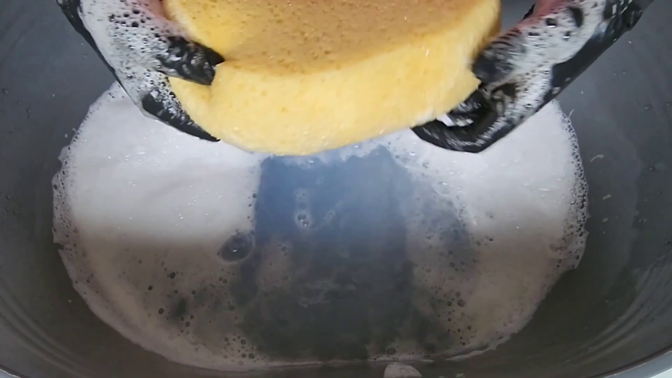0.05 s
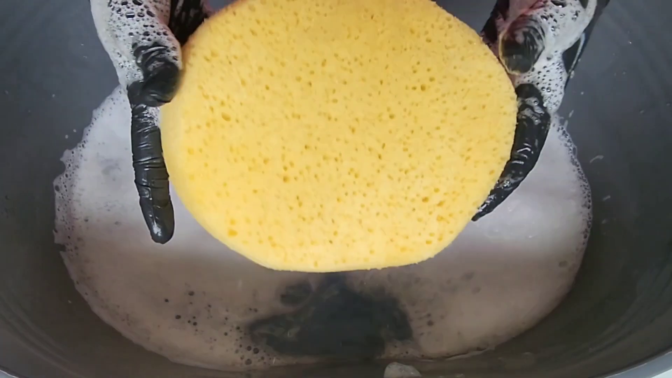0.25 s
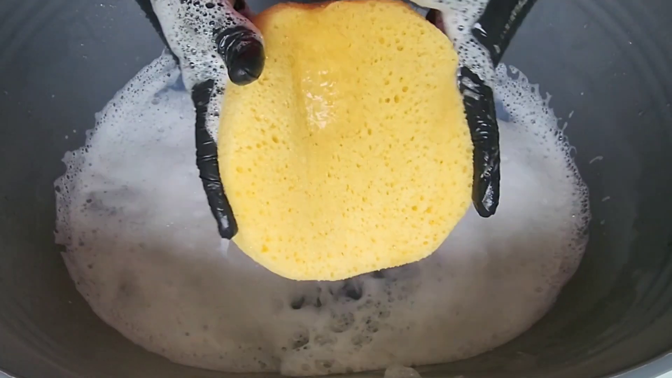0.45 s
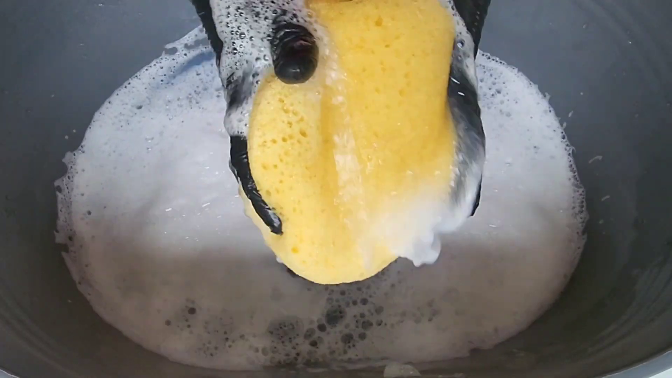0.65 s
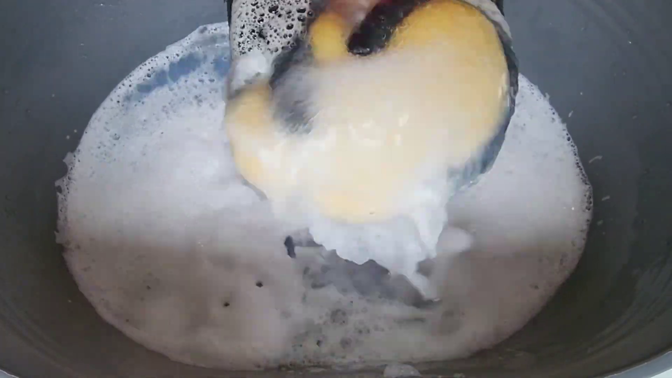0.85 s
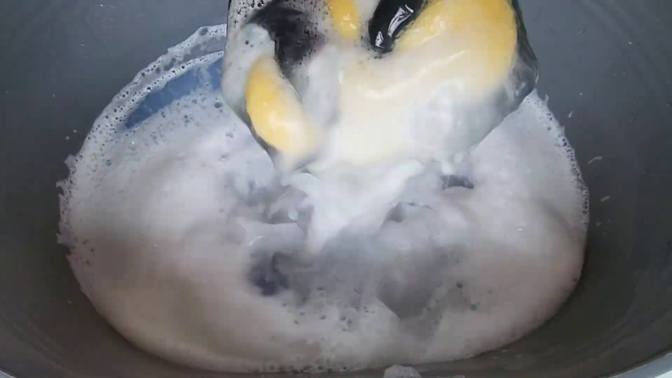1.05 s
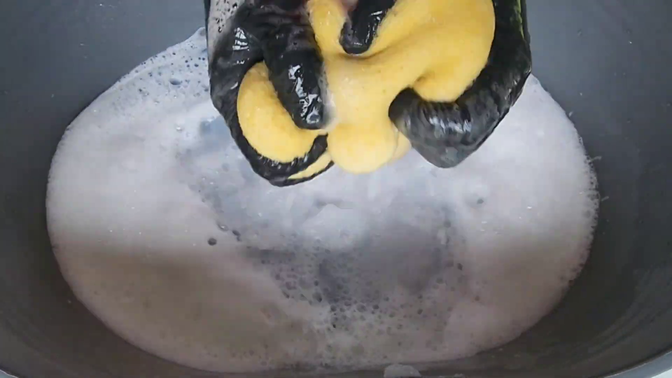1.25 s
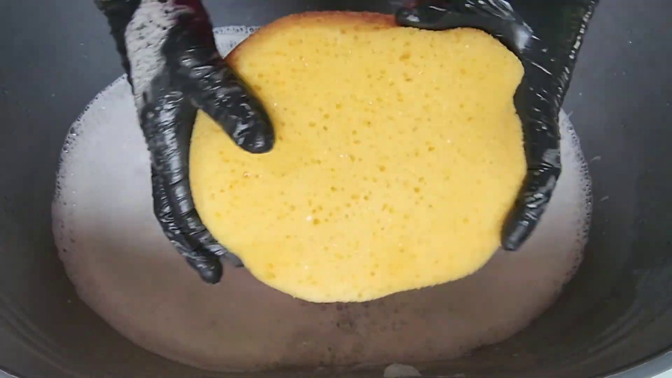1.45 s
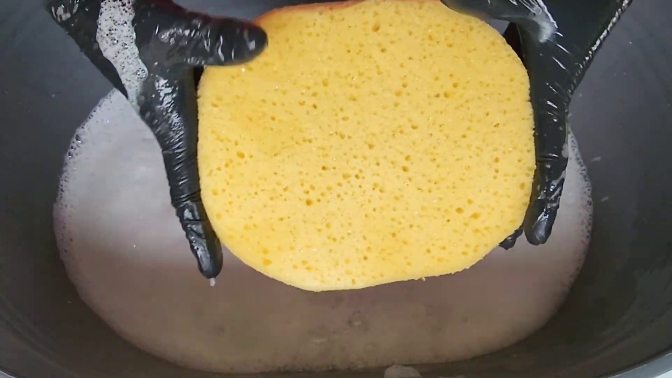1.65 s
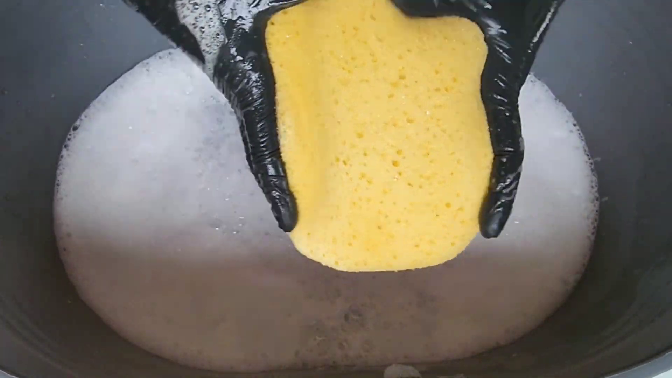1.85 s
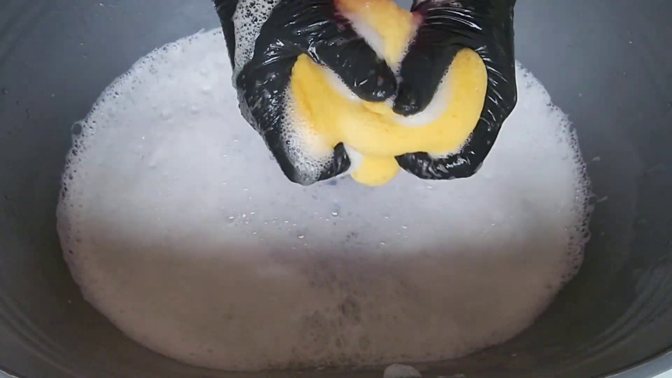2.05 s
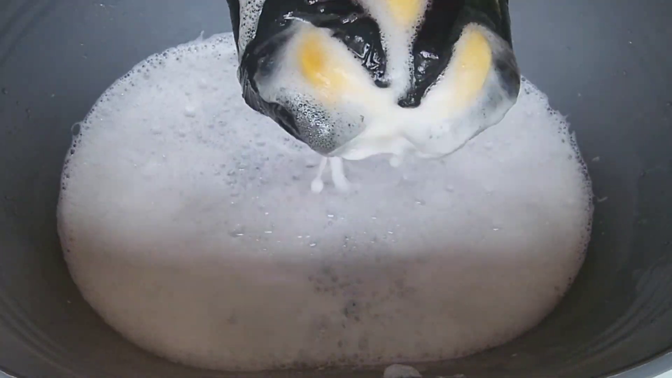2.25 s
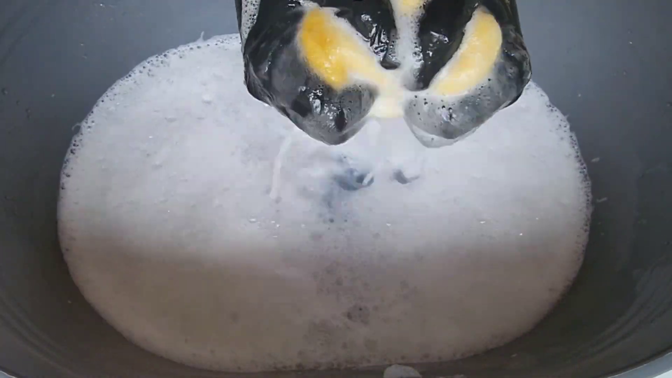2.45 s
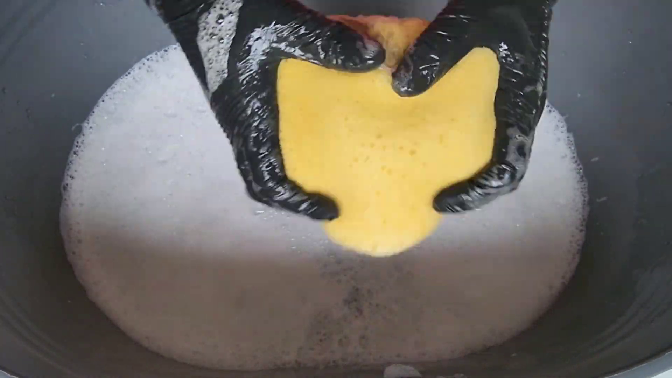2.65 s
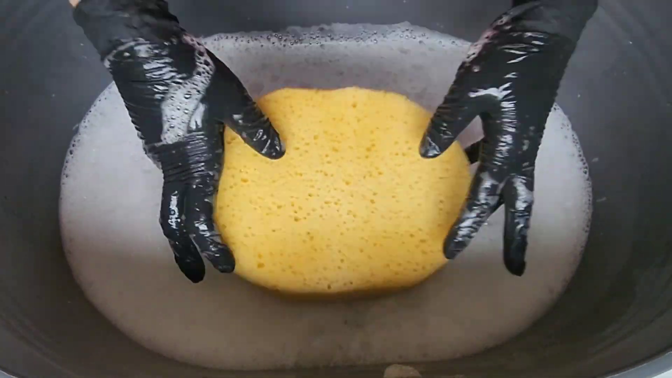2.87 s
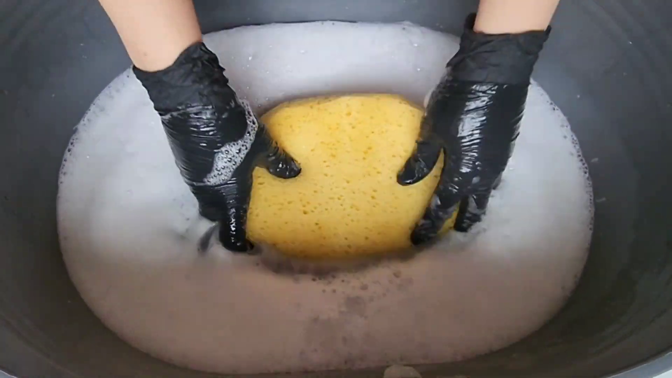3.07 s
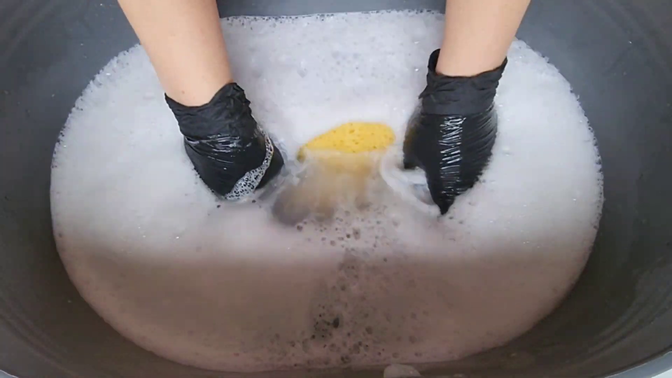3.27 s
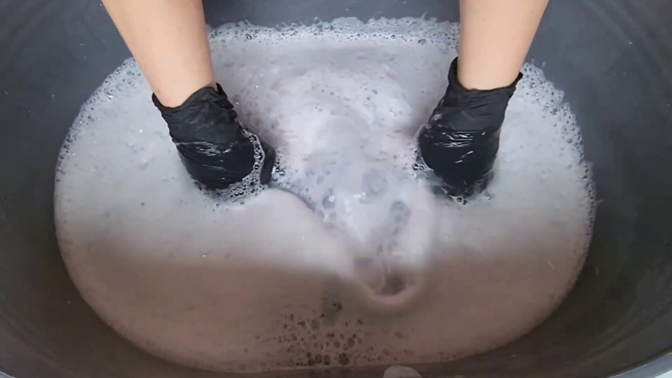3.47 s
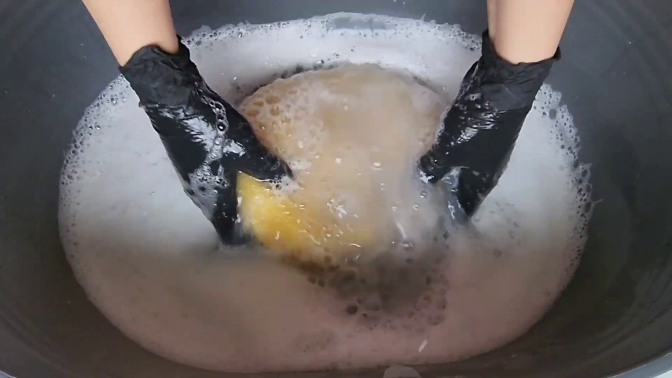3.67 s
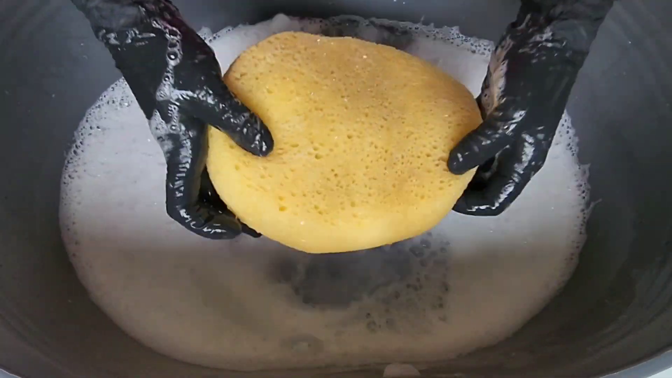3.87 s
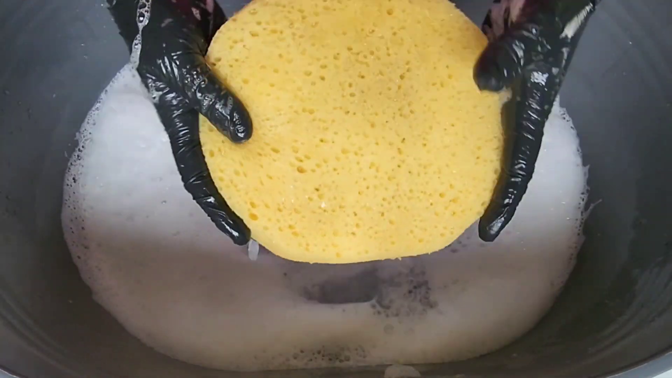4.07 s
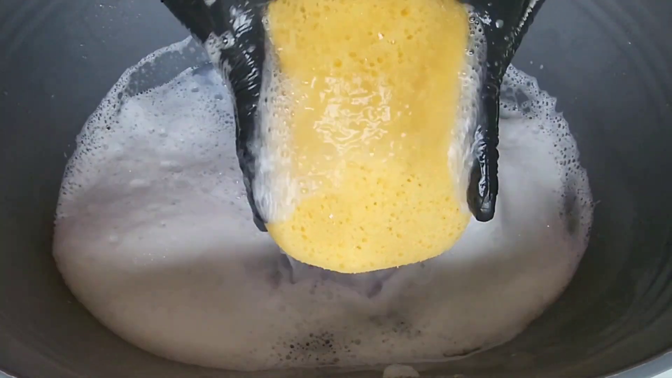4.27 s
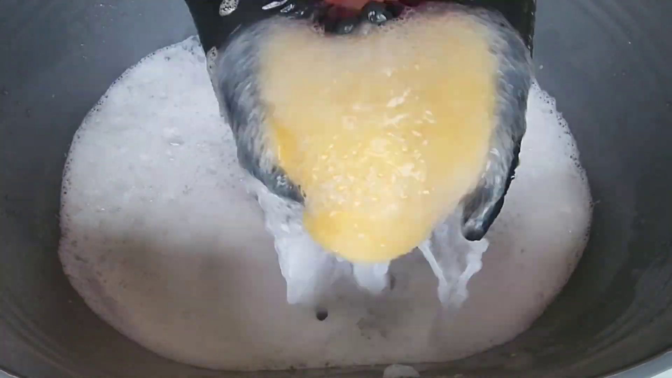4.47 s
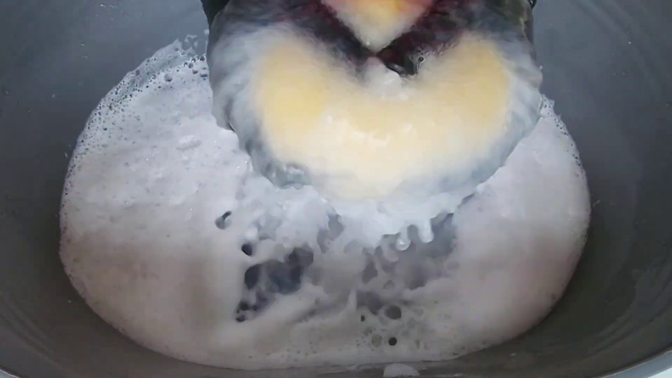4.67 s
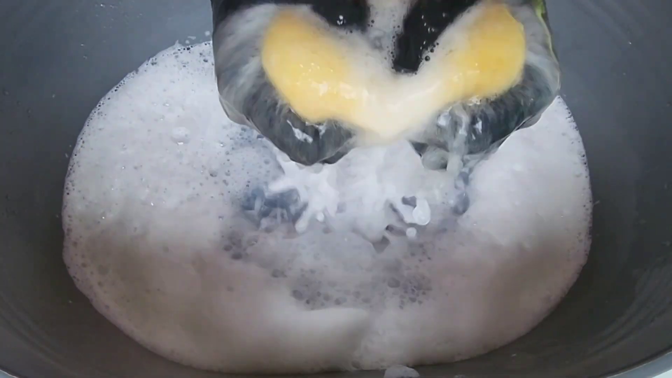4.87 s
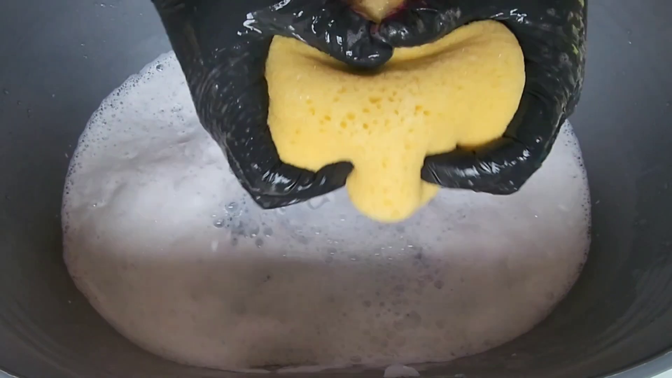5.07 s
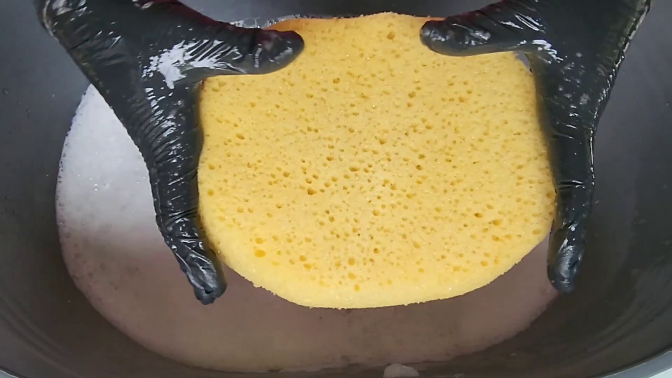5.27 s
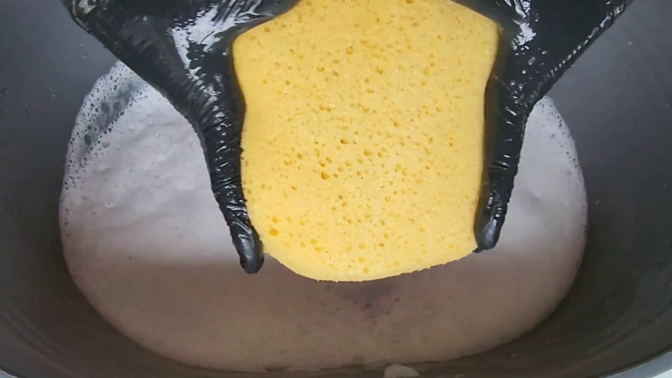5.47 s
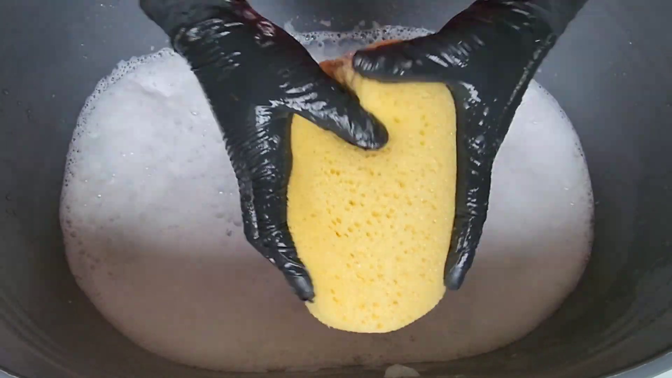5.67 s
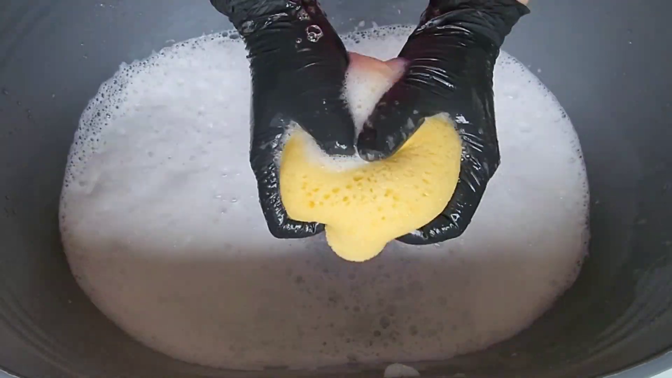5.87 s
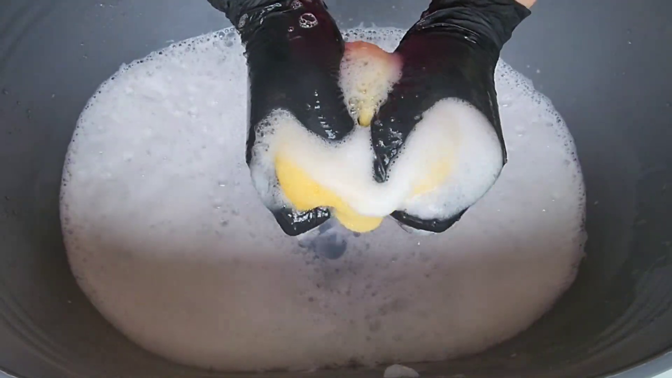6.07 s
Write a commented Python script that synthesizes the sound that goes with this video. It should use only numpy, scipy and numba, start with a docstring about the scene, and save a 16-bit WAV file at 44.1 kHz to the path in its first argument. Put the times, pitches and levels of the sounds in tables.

```python
"""Small room, basin of suds: gloved hands wring a big soapy sponge twice, dunk it, wring it twice more.
Each stroke swells and dies away. Water in the foam: short, damped sine bubbles, coloured or resonated.
Froth, lather and crushed foam: dense swarms of tiny bubbles. Air pockets and gulps: single longer rings.
The gloves tick in clusters of slips; one seal blubbers in puffs. Peak filters make the basin ring a little.
Random echoes make the room; shaped noise gives the faint hiss of the suds and a low rumble."""
import sys
import numpy as np
from scipy import signal
from scipy.fft import rfft, irfft
from scipy.io import wavfile
from scipy.ndimage import uniform_filter1d
from numba import njit

SR = 44100
rng = np.random.default_rng(int(sys.argv[2]) if len(sys.argv) > 2 else 0)


def int16_out(signal):
    """Quantize to a 16-bit WAV file."""
    q = np.round(np.clip(np.atleast_2d(signal).T, -1, 1) * 32767)
    wavfile.write(sys.argv[1], SR, q.astype(np.int16))


N = 269847
TIME = np.arange(N) / SR
STEPS = TIME[::64]   # coarse time grid of the strokes [s]

# Event and curve levels are relative: sources add trims, basin and room act later.
# Stroke rise and fall are the times for 20 dB; roundness 1 is pointed, 2 a bell.

# steady spectra of room rumble and foam hiss: (frequency [Hz], gain [dB])
RUMBLE_COLOUR = [(18, -13), (36, -10), (54, 4), (85, 0.5), (150, -16.5), (260, -15.5), (450, -21.5),
                 (900, -21), (2500, -53.5), (6000, -76.5)]
SUDS_COLOUR = [(600, -20), (2000, -1), (5000, -0.5), (8000, 2.5), (12000, -3), (15800, -1.5)]
RUMBLE_DB, SUDS_DB = -51.5, -55

# larger air pockets bursting:
# (time [s], ring level [dB], pitch [Hz], decay to -60 dB [cycles], snap level [dB])
POPS = [(0.02, -23.5, 739, 9.6, -36.5), (0.0202, -23, 1984, 14.1, -40.5),
        (0.0499, -19.5, 1410, 13.8, -26.5), (0.0665, -17.5, 454, 5.14, -37.5),
        (.1587, -27.5, 680, 4.5, -22), (0.1606, -22, 1130, 12.1, -30.5), (0.1902, -26, 686, 6.2, -25),
        (0.1928, -18.5, 2105, 13.4, -36), (.204, -32, 597, 13.3, -26), (.343, -29, 392.7, 9.5, -19.5),
        (.417, -32, 381.7, 12.5, -20), (.4718, -15, 618, 12.7, -19), (0.4818, -19.5, 579.5, 7.6, -20.5),
        (.629, -20, 599, 10.8, -29.5), (0.6562, -19.5, 516, 4.73, -10), (0.698, -19.5, 520, 6.6, -20),
        (.798, -23, 701, 7.06, -22), (.847, -26.5, 684, 8.5, -25), (0.873, -16, 1141, 8.5, -14),
        (1.008, -20.5, 689, 6.1, -19.5), (1.077, -20.5, 704, 6.9, -19), (1.322, -22.5, 1208, 9.46, -21),
        (1.605, -33.5, 390, 9.85, -34), (2.4, -34, 771, 10.3, -30), (2.564, -28, 429, 4, -32.5),
        (2.661, -32, 440.7, 4.87, -43), (3.264, -28, 675, 10, -27), (3.268, -22.5, 1301, 12, -36.5),
        (3.3164, -3.5, 250.7, 6.23, -36), (3.317, -20.5, 637, 6.26, -41.5), (3.329, -25, 61.7, 6.4, -47),
        (3.353, -15, 189.6, 8.3, -38.5), (3.583, -27, 1351, 11, -54.5), (3.726, -26, 689.9, 7.2, -21.5),
        (3.729, -27, 1129, 14.7, -40.5), (3.787, -25.5, 704, 9.7, -37), (3.824, -22.5, 596.4, 9.9, -18),
        (3.830, -21.5, 1492, 11.35, -23.5), (3.939, -24.5, 1437, 12.97, -33),
        (4.011, -32.5, 746.2, 8.02, -29), (4.061, -23, 3109, 19, -34.5), (4.107, -31, 792.1, 8.3, -24.5),
        (4.219, -20, 3446, 30.74, -36.5), (4.361, -20, 762.2, 10.56, -24.5), (4.4, -15, 1751, 14.22, -31.5),
        (4.416, -13.5, 2200, 19, -42.5), (4.469, -24.5, 680.7, 6.84, -29), (4.559, -16, 1892, 14.78, -30.5),
        (4.591, -12, 1197, 7.99, -14), (4.6706, -4.5, 1670, 12.62, -16), (4.683, -13, 2051, 19.8, -17),
        (4.7145, -19.5, 649.3, 5.14, -14.5), (4.782, -16, 1290, 7.4, -17.5), (4.908, -19, 1390, 16.2, -32),
        (4.935, -15, 1160, 16.28, -20), (4.994, -20, 1210, 13.4, -23.5), (5.052, -22, 1162, 22.6, -23),
        (5.066, -21, 1142, 15.63, -19), (5.203, -20, 221.4, 6.78, -14), (5.302, -32.5, 620.1, 8.77, -49),
        (5.386, -29, 729, 6.78, -53), (6.043, -30, 691.8, 5.94, -38)]

# jets of foam spitting from between the fingers: (time [s], level [dB], length [s])
SPITS = [(0.05, -34, 0.0029), (0.066, -32, 0.0082), (.203, -37, 0.0119), (.415, -31, 0.0039),
         (0.474, -37.5, 0.00524), (0.964, -30, 0.0151), (1.073, -30.5, 0.01193), (1.197, -31, 0.00912),
         (1.606, -33.5, 0.00169), (3.822, -37, 0.0147), (4.112, -34, 0.0211), (4.281, -32, 0.00568),
         (4.358, -30.5, 0.00671), (4.714, -22.5, 0.00447), (4.73, -25.5, 0.0057), (4.936, -28.5, 0.0077)]

# water set moving by each stroke: (peak time [s], rise [s], fall [s], roundness [1],
# splash level [dB], churn level [dB], cloud pitch at peak [Hz], bubble rate at peak [1/s])
GUSHES = [(0.065, 0.1505, 0.099, 1.804, -41, -42, 442, 502),
          (0.21, 0.0898, 0.29, 1.117, -39, -67.5, 440, 719.5),
          (0.66, 0.0858, 0.2006, 1.235, -35, -36, 335.6, 859),
          (0.93, 0.8324, 0.653, 1.877, -33.5, -34.5, 264.7, 1000),
          (1.33, 0.0984, 0.282, 1.46, -46, -44, 213, 1678),
          (2.18, 0.3365, 0.226, 0.948, -44, -51.5, 281.7, 5270),
          (2.45, 0.0631, 0.104, 1.582, -58, -49, 519.2, 1532),
          (2.57, 0.1608, 0.3255, 1.306, -47, -46.5, 410.1, 2780),
          (3.345, 0.07, 0.26, 0.86, -39, -32.5, 180.5, 894),
          (3.54, 0.16, 0.15, 1.3, -45.5, -42, 219.8, 522),
          (3.79, .17, 0.2795, 1.105, -37.5, -43.5, 590, 1940),
          (3.82, 0.3814, .28, 1.612, -55, -47, 279.7, 830),
          (4.117, 0.031, 0.07056, 1.103, -32.5, -45, 420.4, 809),
          (4.32, 0.1998, .2, 1.65, -45, -37.5, 329.8, 509),
          (4.48, 0.048, 0.0716, 0.997, -44.5, -35.5, 308, 964),
          (4.73, 0.74, 0.5555, 1.8, -30, -34, 280, 1250),
          (4.94, 0.03637, 0.3074, 0.989, -35.5, -37, 255, 1622),
          (5.87, 0.0731, 0.206, 0.902, -36.5, -37.5, 285.6, 3545)]
# churn and splash filters: (frequency [Hz], gain [dB])
THUD_COLOUR = [(35, -10), (54, 1), (80, -5), (112, 2), (158, -4), (255, 1), (380, -2), (480, 0.5),
               (700, -6), (1500, -21.5)]
POUR_COLOUR = [(200, -16), (400, -8.5), (600, -4), (900, -5.5), (1300, -1), (2100, 1), (2900, -9),
               (5000, -9.5), (12000, -48)]
CLOUD_SINK_OCTAVES_PER_S = 0.994   # the cloud under the stream sinks in pitch as it takes in air
THUD_DB_PER_OCTAVE, THUD_REFERENCE_HZ = 11.5, 257.7   # thuds gain weight as the cloud sinks
BREAKUP_FOLLOWS = 0.7   # share of the flow's dB swing that the bubble rate follows
POUR_SURGE_DB, POUR_SURGE_HZ = 1.8549, 32   # uneven surges: spread, bandwidth
DROPS_PER_S, DROPS_DB = 70, -8.5   # single drops breaking away; level against the splash
DUNK_FROM_S, DUNK_TO_S, DUNK_RAMP_S, DUNK_MUFFLE_DB = 3.35, 3.72, 0.0521, 8   # sponge under water
SWIRL_START_HZ, SWIRL_RISE_OCTAVES_PER_S = 254.75, 4.7   # filling sponge: smaller, higher bubbles

# pushes that press froth through the pores: (peak time [s], rise [s], fall [s], roundness [1],
# level [dB], top-band gain [dB], bubble rate [1/s])
PUSHES = [(0.075, 0.1222, 0.1012, 1.032, -43, 3, 7590), (0.22, 0.0979, 0.329, 1.003, -38.5, -6, 8230),
          (1.06, 1.19, 0.447, 1.238, -35.5, -0.5, 15270), (1.3, 0.161, 0.264, 1.031, -36, -2.5, 16140),
          (2.15, 0.345, 0.253, 0.684, -35.5, -0.5, 49500), (2.55, 0.0514, 0.1606, 1.1, -38, 2.5, 27100),
          (2.73, 0.076, 0.1468, 1.115, -46.5, 3, 20800), (2.885, 0.0252, 0.457, 0.816, -48.5, -7.5, 17000),
          (3.31, 0.211, 0.316, 1.041, -50.5, -1.5, 8750), (3.83, 0.2015, 0.261, .7, -41, -1.5, 11000),
          (4.15, 0.501, 0.2003, 0.896, -43.5, -0.5, 10130), (4.38, .04, 0.21, 1, -40.5, 5.5, 10200),
          (4.73, 0.05776, 0.0694, 1.138, -31, -5, 20840), (4.76, 0.814, 0.565, 1.867, -34.5, 0.5, 16100),
          (4.96, 0.0638, 0.0957, 1.2, -37.5, -3, 14480), (5.22, 0.2034, 0.1117, 1.84, -46, -2.5, 14060),
          (5.99, 0.417, 0.222, 1.136, -41, -0.5, 28300)]
# froth filter: (frequency [Hz], gain [dB])
FROTH_COLOUR = [(400, -35), (1000, 10), (2500, 3.5), (4000, 4.5), (5500, 1), (7500, 1), (9500, -5),
                (12000, -5), (15800, -6.5)]
FINER_DB_PER_S = 3   # froth gets finer, its top band brighter, through a push

# lumps of water slapping onto the suds: (time [s], level [dB], length [s])
SLAPS = [(.16, -35, 0.0049), (.211, -40, 0.006), (.232, -36, 0.005), (.511, -34, 0.0086),
         (.588, -38.5, 0.00562), (.871, -30, 0.0069), (.981, -31.5, 0.00493), (1.008, -29.5, 0.00504),
         (1.076, -31.5, 0.0077), (1.108, -34.5, 0.0036), (1.272, -32.5, 0.00422), (1.354, -35.5, 0.0043),
         (3.313, -33, 0.0086), (3.344, -39.5, 0.0164), (3.726, -37.5, 0.00852), (3.824, -32.5, 0.014),
         (4.011, -37, 0.00703), (4.107, -32, 0.00406), (4.136, -28.5, 0.00572), (4.274, -32, 0.00947),
         (4.361, -34, 0.00607), (4.591, -28, 0.004996), (4.713, -31.5, 0.005845), (4.741, -28.5, 0.00485),
         (4.908, -30, 0.0085), (4.966, -30.5, 0.00696)]

# deep bubbles pulled under by the stream or let go by the sunken sponge:
# (peak time [s], level [dB], pitch [Hz])
GULPS = [(.567, -28.5, 567), (.591, -26.5, 331), (.632, -21.5, 319.8), (.679, -23.5, 308.3),
         (0.771, -29, 274.7), (.8, -28.5, 289), (.858, -23.5, 366), (1.013, -30, 273.6),
         (1.079, -25.5, 276.6), (1.16, -26, 244.5), (1.204, -26, 289), (1.44, -24.5, 224.8),
         (3.348, -19, 324), (3.364, -18, 327.5), (3.491, -30.5, 399.8), (3.523, -35, 475.7),
         (3.543, -34, 562.8), (3.565, -32, 676.8), (3.754, -29, 575.7), (3.885, -33, 570),
         (4.209, -24.5, 405.8), (4.362, -28.5, 329.8), (4.475, -22, 310.5), (4.491, -18, 328.6),
         (4.601, -23, 292), (4.633, -23.5, 308.7), (4.674, -23.5, 294), (4.764, -24, 313.8),
         (4.805, -22.5, 265), (4.864, -21.5, 265.2), (4.941, -24.5, 300.2), (5.061, -23, 258)]

# wet rubber ticking as the gloves shift grip: (time [s], level [dB], pitch [Hz])
TICKS = [(1.6061, -21.5, 2360), (1.6338, -30, 1594), (2.329, -40, 1600), (2.3996, -28.5, 1899),
         (2.457, -31.5, 2610), (2.489, -21.5, 3520), (2.506, -31, 1500), (2.521, -32, 1900),
         (3.216, -32.5, 2004)]

# thick lather squelching in a nearly dry sponge, wrung or springing back:
# (peak time [s], rise [s], fall [s], roundness [1], level [dB])
LATHER = [(2.2, 0.077, 0.0937, 2.595, -35.5), (2.73, 0.0704, 0.084, 1.297, -48.5),
          (5.99, 0.148, 0.188, 2.53, -40)]
# lather filter: (frequency [Hz], gain [dB])
LATHER_COLOUR = [(500, -27), (1000, -4), (2200, -2.5), (4400, 3), (6500, -0.5), (8500, -3.5),
                 (15000, -40.5)]

# sponge landing on the suds and crushing its way down: (time [s], level [dB])
CRUSH = [(2.855, -79), (2.868, -49.5), (2.888, -37.5), (2.915, -45), (2.94, -46), (3.02, -51),
         (3.055, -56.5), (3.13, -55), (3.27, -56.5), (3.33, -77.5)]
# crush filter: (frequency [Hz], gain [dB])
CRUSH_COLOUR = [(150, -10), (330, -2), (560, -0.5), (900, -5.5), (1400, -1.5), (2100, -1), (3500, -14.5),
                (8000, -33)]

# air blubbering out between glove and sponge in the last wring: (time [s], level [dB])
BLUBBER = [(5.822, -70), (5.831, -41), (5.87, -35), (5.91, -36), (5.97, -38), (6.0, -38.5), (6.025, -49),
           (6.12, -54)]
# blubber filter: (frequency [Hz], gain [dB])
BLUBBER_COLOUR = [(70, -20.5), (160, -3.5), (260, 3), (390, -1.5), (470, -12.5), (680, -10), (950, -16),
                  (1200, -24.5), (1600, -13.5), (4000, -22)]

# resonances of the basin: (frequency [Hz], width [Hz], boost [dB])
BASIN = [(255.54, 90.2, 4.0), (387.8, 44, 4), (558.9, 78.2, 5.5), (709.2, 102.8, 6), (1176.5, 258, 3),
         (1811, 95, -1.5)]
# stereo width: (frequency [Hz], side gain [dB])
WIDTH = [(60, -14), (220, -13.5), (500, -1.5), (1200, 1), (2700, 0), (4500, 0), (6300, 1), (7800, -8.5),
         (15000, -7)]
ROOM_T60_S, CUTOFF_HZ = 0.415, 15750


def from_db(db):
    """Decibels to gain."""
    return 10 ** (np.asarray(db) / 20)


def rms_one(x):
    """Scale to unit power."""
    return x / np.sqrt(np.mean(x ** 2) + 1e-20)


def in_time(rows):
    """Each column of a curve, sample by sample."""
    s, *values = np.transpose(rows)
    return [np.interp(TIME, s, value) for value in values]


def columns(rows):
    """Columns of an event table, one event to a line."""
    return np.transpose(rows)[:, :, None]


def stroke_db(s, rise_s, fall_s, roundness):
    """Level of each stroke below its peak, on STEPS."""
    away = np.maximum((s - STEPS) / rise_s, (STEPS - s) / fall_s)
    return -np.minimum(20 * away ** roundness, 120)


def overlap(levels_db, *traits):
    """Strokes add in power, which also weights their traits: level [dB], then traits, per sample."""
    power = from_db(levels_db) ** 2
    total = power.sum(axis=0)
    curves = [10 * np.log10(total)]
    curves += [(power * trait).sum(axis=0) / total for trait in traits]
    return [np.interp(TIME, STEPS, curve) for curve in curves]


def bursts(rows):
    """Gain of brief showers, each peaking at half its length and dying quickly."""
    gain = np.zeros(N)
    for s, level_db, length_s in rows:
        age = TIME[:SR // 8] / length_s
        start = int(s * SR)
        gain[start:start + len(age)] += from_db(level_db) * 2 * age * np.exp(1 - 2 * age)
    return gain


def drift(rate_hz):
    """Random wander below rate_hz, spread 1, drawn at 1/40 of the sample rate."""
    lowpass_sos = signal.butter(2, rate_hz * 40, fs=SR, output="sos")
    slow = signal.sosfilt(lowpass_sos, rng.standard_normal(N // 40 + 500))[400:]
    return np.interp(np.arange(N) / 40, np.arange(len(slow)), rms_one(slow))


def lowpass(x, hz, order=2):
    """Butterworth low-pass."""
    return signal.sosfilt(signal.butter(order, min(hz, SR / 2 - 1), fs=SR, output="sos"), x)


def coloured(x, spectrum, size=4096):
    """Causal (minimum-phase) filter through the points of a spectrum."""
    hz, db = np.transpose(spectrum)
    grid_hz = np.maximum(np.fft.rfftfreq(size, 1 / SR), 1)
    cepstrum = irfft(np.log(from_db(np.interp(np.log(grid_hz), np.log(hz), db))))
    # fold onto positive time
    cepstrum[1:size // 2] *= 2
    cepstrum[size // 2 + 1:] = 0
    impulse = irfft(np.exp(rfft(cepstrum)))
    return signal.oaconvolve(x, impulse[None], axes=1)[:, :N]


@njit
def resonate(x, hz, q):
    """State-variable band-pass with moving centre; gain 1 on top."""
    out, low, band = np.zeros(N), 0.0, 0.0
    for i in range(N):
        step = 2 * np.sin(np.pi * hz[i] / SR)
        low += step * band
        band += step * (x[i] - low - band / q)
        out[i] = band / q
    return out


@njit
def rings(start, height, hz, cycles, rise, swell):
    """Sines building up over swell cycles, decaying at 60 dB per cycles, pitch rising by the share rise."""
    out = np.zeros(N)
    for k in range(len(start)):
        life_s = cycles[k] / hz[k]
        strength, loss = height[k], 0.001 ** (1 / (life_s * SR))
        first = max(int(start[k] * SR) + 1, 0)
        last = min(int((start[k] + .8 * life_s) * SR), N)
        for i in range(first, last):
            turns = hz[k] * (i / SR - start[k])
            phase = 2 * np.pi * turns * (1 + rise * turns / cycles[k] / 2)
            out[i] += strength * min(turns / swell, 1.0) * np.sin(phase)
            strength *= loss
    return out


def bubbles(start, height, hz, cycles, rise, swell=0.072, spread_s=.00008, pan_db=3.5):
    """Each bubble has its own place: its own lag and balance between left and right."""
    lag, pan = rng.standard_normal((len(start), 2)).T
    sides = []
    for side in (1, -1):
        arrival_s = start + side * lag * spread_s / 2
        side_height = height * from_db(side * pan * pan_db / 2)
        sides.append(rings(arrival_s, side_height, hz, cycles, rise, swell))
    return np.array(sides)


def swarm(per_s, low_hz, high_hz, cycles, size_db, rise):
    """Random bubbles of even mean power: the fewer they are, the larger each one."""
    per_s = per_s * np.ones(N)
    at = np.flatnonzero(rng.random(N) < per_s / SR)
    pitch, size, damping, sign = rng.random((len(at), 4)).T
    hz = low_hz * (high_hz / low_hz) ** np.sqrt(pitch)   # small bubbles outnumber large ones
    size_gain = from_db(size_db * np.minimum(-np.log(1 - size), 3))
    height = size_gain * np.sqrt(hz / per_s[at])
    return bubbles(at / SR, height * np.sign(sign - .5), hz, cycles * (.5 + damping), rise)


def rumble():
    """Steady low background of the room: shaped noise, partly shared by both sides."""
    noise = rng.standard_normal(N) + 2.0 * rng.standard_normal((2, N))
    return from_db(RUMBLE_DB) * rms_one(coloured(noise, RUMBLE_COLOUR, size=16384))


def suds():
    """The blanket of foam in the basin never stops its faint, even hiss: shaped noise."""
    noise = rng.standard_normal(N) + 2.0 * rng.standard_normal((2, N))
    return from_db(SUDS_DB) * rms_one(coloured(noise, SUDS_COLOUR))


def pops(snap_hz=2300, snap_cycles=2.25, scatter_s=.002, droplet_db=-5, count=6):
    """A film snaps, the air pocket behind it swells and rings, droplets of the film patter after."""
    s, ring_db, hz, cycles, snap_db = np.transpose(POPS)
    each = np.ones(len(s))
    cavity = bubbles(s, from_db(ring_db + 1.0), hz, cycles,
                     rise=0.0123, swell=0.751, spread_s=.00004, pan_db=3.0)
    snap = bubbles(s, -from_db(snap_db + 4.5), snap_hz * each, snap_cycles * each,
                   rise=0.077, spread_s=.00005)
    late, pitch, size = rng.random((len(s) * count, 3)).T
    height = np.repeat(from_db(snap_db + droplet_db), count) * (2 * size - 1)
    start = np.repeat(s, count) - scatter_s * np.log(1 - late)
    droplets = bubbles(start, height, 1100 * 5.5 ** pitch, 6 + 8 * pitch, rise=0.098)
    return cavity + snap + droplets


def spits():
    """Each jet is a brief shower of tiny bubbles."""
    shower = swarm(per_s=9000, low_hz=1600, high_hz=17500, cycles=14, size_db=1.5, rise=.05)
    return bursts(SPITS) * rms_one(shower)


def churn(cloud_q=2.38, cloud_db=7, wander=0.1194, deep_hz=420):
    """Lumps of water thud into the basin; others set the restless cloud of bubbles booming."""
    s, rise_s, fall_s, roundness, _, churn_db, peak_hz, _ = columns(GUSHES)
    sinking_hz = peak_hz * 2 ** (-CLOUD_SINK_OCTAVES_PER_S * np.clip(STEPS - s, -1, 1))
    level_db, cloud_hz = overlap(churn_db + stroke_db(s, rise_s, fall_s, roundness), sinking_hz)
    thuds, lumps = [
        coloured(swarm(per_s=560, low_hz=35.14, high_hz=697, cycles=4.8, size_db=2.0, rise=0.072),
                 THUD_COLOUR)
        for _ in range(2)]
    weight = from_db(-THUD_DB_PER_OCTAVE * np.log2(cloud_hz / THUD_REFERENCE_HZ))
    cloud_hz = cloud_hz * np.exp(wander * drift(rate_hz=29.1))
    boom = np.array([resonate(resonate(side, cloud_hz, cloud_q), cloud_hz, cloud_q) for side in lumps])
    mix = weight * lowpass(thuds, deep_hz) + from_db(cloud_db) * boom
    return from_db(level_db - 2.5) * rms_one(mix)


def drops(smack_hz=2600, smack_cycles=3.8, ring_db=-6, ring_hz=1150, ring_cycles=11,
          delay_s=0.001999, size_db=8):
    """A drop smacks the surface; a moment later the bubble it traps rings and rises."""
    s = np.flatnonzero(rng.random(N) < DROPS_PER_S / SR) / SR
    size, smack, pitch, late = rng.uniform(-1.01, 1, (4, len(s)))
    height, each = from_db(size_db * size / 2), np.ones(len(s))
    impact = bubbles(s, height, smack_hz * 2 ** smack, smack_cycles * each, rise=.1, spread_s=.00005)
    trapped = bubbles(s + delay_s * (1 + late), height * from_db(ring_db),
                      ring_hz * 2 ** pitch, ring_cycles * each, rise=0.244)
    return rms_one(impact + trapped)


def swirl(q=0.97):
    """Under water the bubbles merge into a dull swirl through a rising band-pass."""
    merged = swarm(per_s=420, low_hz=121.3, high_hz=1518.7, cycles=12.3, size_db=2.0, rise=0.364)
    merged = lowpass(merged, hz=824)
    under_s = np.clip(TIME, DUNK_FROM_S, DUNK_TO_S) - DUNK_FROM_S
    centre_hz = SWIRL_START_HZ * 2 ** (SWIRL_RISE_OCTAVES_PER_S * under_s)
    return rms_one(np.array([resonate(side, centre_hz, q) for side in merged]))


def pour(plop_db=-12):
    """Falling water traps bubbles that foam damps in a few cycles; the dunk fades them into the swirl."""
    s, rise_s, fall_s, roundness, splash_db, _, _, peak_per_s = columns(GUSHES)
    flow_db = stroke_db(s, rise_s, fall_s, roundness)
    rate_per_s = peak_per_s * from_db(BREAKUP_FOLLOWS * np.maximum(flow_db, -15))
    level_db, per_s = overlap(splash_db + flow_db, rate_per_s)
    splash = swarm(per_s, low_hz=387.6, high_hz=4368, cycles=9.65, size_db=2.0, rise=0.287)
    splash = rms_one(coloured(splash, POUR_COLOUR))
    # a few bubbles reach open water and ring longer
    plops = swarm(per_s=130, low_hz=523.6, high_hz=2982, cycles=33.5, size_db=1.5, rise=0.483)
    splash = splash + from_db(plop_db) * rms_one(plops) + from_db(DROPS_DB) * drops()
    splash = rms_one(splash * from_db(POUR_SURGE_DB * drift(POUR_SURGE_HZ)))
    depth = np.clip(np.minimum(TIME - DUNK_FROM_S, DUNK_TO_S - TIME) / DUNK_RAMP_S, 0, 1)
    open_share = from_db(-DUNK_MUFFLE_DB * depth)
    sunk_share = np.sqrt(np.clip(1 - open_share ** 2, 0, 1))
    return from_db(level_db - 1.5) * (open_share * splash + sunk_share * swirl())


def froth(clump_db=2.0, split_hz=7800):
    """Tiny films burst by the thousand, in clumps; the finer the froth, the brighter its fizz."""
    s, rise_s, fall_s, roundness, peak_db, fine_db, peak_per_s = columns(PUSHES)
    finer_db = fine_db + FINER_DB_PER_S * np.clip(STEPS - s, -1, 1)
    push_db = peak_db + stroke_db(s, rise_s, fall_s, roundness)
    level_db, top_db, per_s = overlap(push_db, finer_db, peak_per_s)
    fizz = swarm(per_s, low_hz=1274.9, high_hz=17446, cycles=40.5, size_db=4.5, rise=0.0275)
    fizz = rms_one(coloured(fizz, FROTH_COLOUR) * from_db(clump_db * drift(rate_hz=99.4)))
    coarse = signal.sosfiltfilt(signal.butter(3, split_hz, fs=SR, output="sos"), fizz)
    return from_db(level_db + 1.5) * (coarse + from_db(top_db + 5.5) * (fizz - coarse))


def slaps(low_cut_hz=700):
    """Each lump of water shatters into a crisp cluster of heavily damped bubbles."""
    shatter = swarm(per_s=7000, low_hz=599, high_hz=2660, cycles=5.87, size_db=-0.63, rise=0.117)
    return bursts(SLAPS) * rms_one(shatter - lowpass(shatter, low_cut_hz, order=1))


def gulps(cycles=12, swell=1.31):
    """A big bubble builds up over about a cycle, rings a few more and rises a little in pitch."""
    s, level_db, hz = np.transpose(GULPS)
    return bubbles(s - swell / hz, from_db(level_db + 2.5), hz, np.full(len(s), cycles),
                   rise=0.068, swell=swell, spread_s=.00004, pan_db=1.5)


def ticks(cycles=7.4, slip_s=0.0005874, slip_loss_db=2.5, pitch_spread=0.3, count=5):
    """The rubber lets go in a few tiny slips, each weaker than the last."""
    s, level_db, hz = columns(TICKS)
    gap, pitch = rng.standard_normal((len(TICKS), 2, count)).transpose(1, 0, 2)
    slip = np.arange(count)
    start = s + slip_s * slip * np.exp(0.2566 * gap)
    height = from_db(level_db - slip_loss_db * slip) * (-1) ** slip
    hz = hz * np.exp(pitch_spread * pitch)
    return bubbles(start.ravel(), height.ravel(), hz.ravel(), np.full(hz.size, cycles),
                   rise=0.02, spread_s=.00005)


def lather():
    """Packed foam tears in so many places at once that it gives a soft, even hiss."""
    s, rise_s, fall_s, roundness, peak_db = columns(LATHER)
    level_db, = overlap(peak_db + stroke_db(s, rise_s, fall_s, roundness))
    tearing = swarm(per_s=15000, low_hz=624, high_hz=12100, cycles=23.4, size_db=-7.0, rise=0.049)
    return from_db(level_db) * rms_one(coloured(tearing, LATHER_COLOUR))


def crush():
    """Foam flattened under the sponge bursts in a dense, dull rustle."""
    level_db, = in_time(CRUSH)
    bursting = swarm(per_s=7000, low_hz=237, high_hz=5080, cycles=7.7, size_db=0.0, rise=0.122)
    return from_db(level_db) * rms_one(coloured(bursting, CRUSH_COLOUR))


def blubber(per_s=200, unevenness=.45, size_db=3.5, steady_s=0.0408):
    """A wet seal opens and shuts in quick uneven puffs; the squeeze sets their mean strength."""
    level_db, = in_time(BLUBBER)
    gap, size, pitch = rng.standard_normal((80, 3)).T
    s = BLUBBER[0][0] + np.cumsum(np.exp(unevenness * gap)) / per_s
    puffs = bubbles(s, from_db(size_db * size), 1300 * np.exp(.25 * pitch), np.full(len(s), 1.47),
                    rise=0.0988)
    puffs = coloured(puffs, BLUBBER_COLOUR)
    # level out the running power, with a floor
    power = uniform_filter1d(np.mean(puffs ** 2, axis=0), int(steady_s * SR))
    return from_db(level_db) * puffs / np.sqrt(power + power.max() * 1e-3)


def basin(x):
    """The air in the tub favours a few pitches: peak filters in series."""
    for hz, width_hz, boost_db in BASIN:
        peak = signal.lfilter(*signal.iirpeak(hz, hz / width_hz, fs=SR), x)
        x = x + (from_db(boost_db) - 1) * peak
    return from_db(-1.0) * x


def room(x, wall_db=-6, wall_t60_s=0.0854, tail_db=-14, dull_hz=13000):
    """Quick sparse echoes from the walls of the tub, then a short faint tail from the room."""
    t = TIME[:SR // 2]
    near, far = rng.standard_normal((2, 2, len(t)))
    sparse = rng.random((2, len(t))) < 2500 / SR
    walls = near * sparse * (t > .002) * from_db(-60 * t / wall_t60_s)
    tail = far * (t > .008) * from_db(-60 * t / ROOM_T60_S)
    echoes = (from_db(wall_db) * rms_one(walls) + from_db(tail_db) * rms_one(tail)) / np.sqrt(len(t))
    return x + signal.oaconvolve(x, lowpass(echoes, dull_hz, order=1), axes=1)[:, :N]


def scene():
    """Water, foam and gloves through basin and room, over suds hiss and rumble."""
    water = pops() + churn() + pour() + slaps() + gulps() + blubber()
    foam = spits() + froth() + lather() + crush()
    return room(basin(water + foam + ticks())) + suds() + rumble()


def record(dry):
    """Side level by frequency: narrow in the bass and the top; the treble is cut."""
    mid = (dry[:1] + dry[1:]) / 2
    side = coloured((dry[:1] - dry[1:]) / 2, WIDTH)
    balance = from_db(0.128 * np.array([[-1], [1]]))
    pair = np.vstack([mid + side, mid - side]) * balance
    return signal.sosfilt(signal.ellip(10, .1, 80, CUTOFF_HZ, fs=SR, output="sos"), pair)


dry = scene()
out = record(dry)
int16_out(out)
```